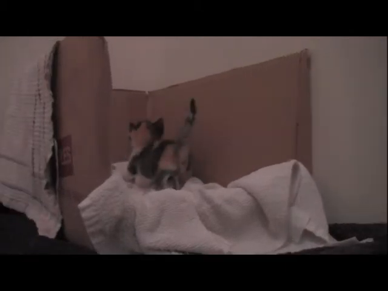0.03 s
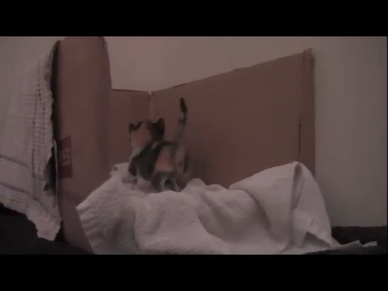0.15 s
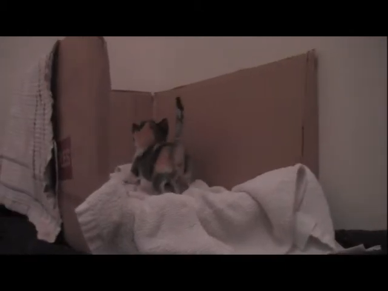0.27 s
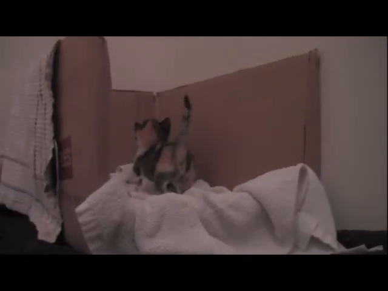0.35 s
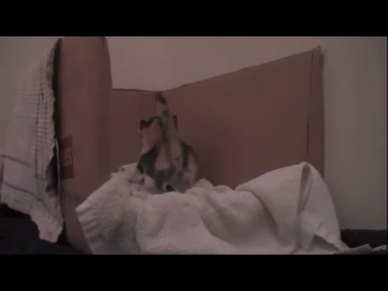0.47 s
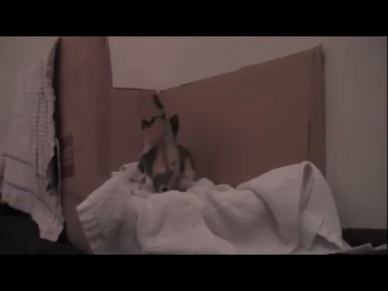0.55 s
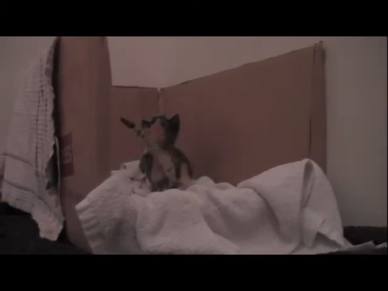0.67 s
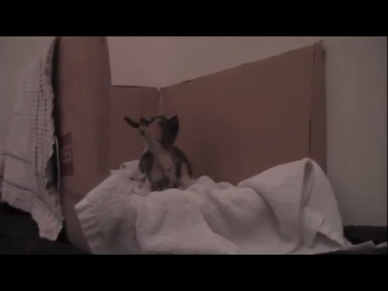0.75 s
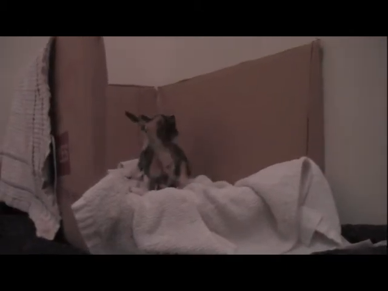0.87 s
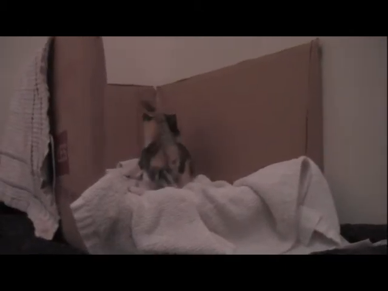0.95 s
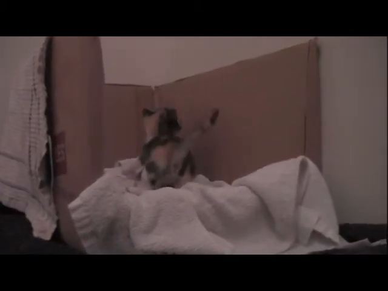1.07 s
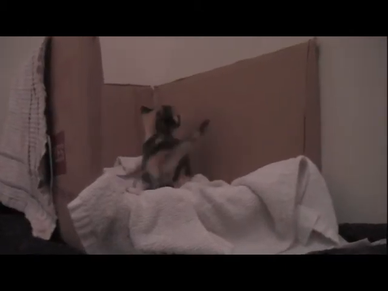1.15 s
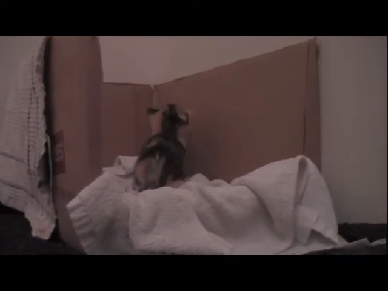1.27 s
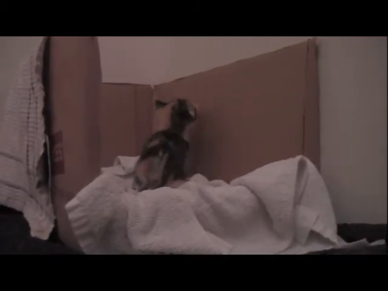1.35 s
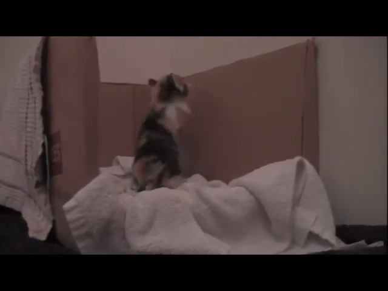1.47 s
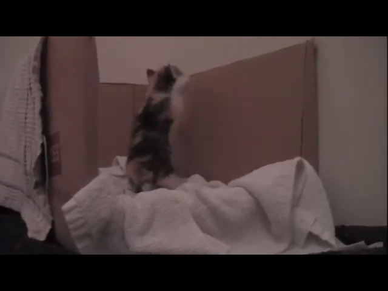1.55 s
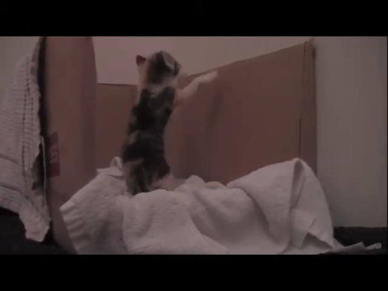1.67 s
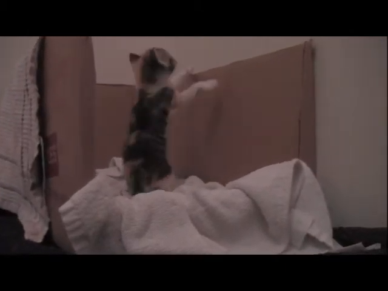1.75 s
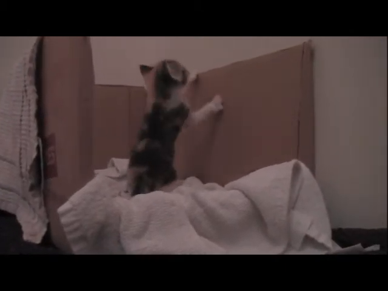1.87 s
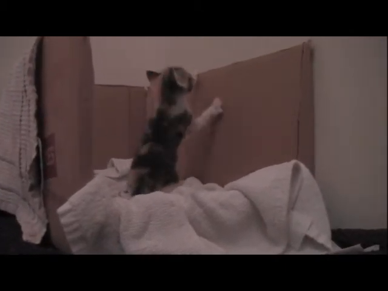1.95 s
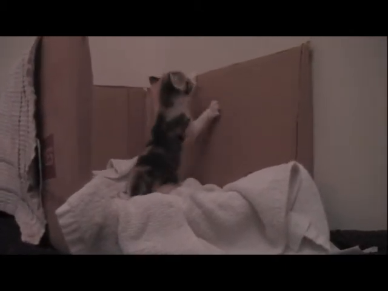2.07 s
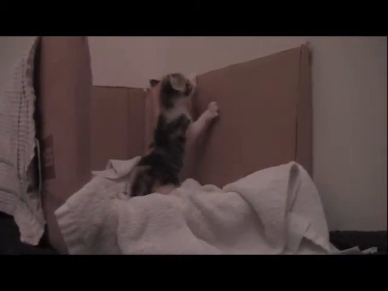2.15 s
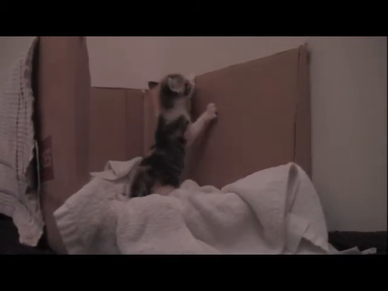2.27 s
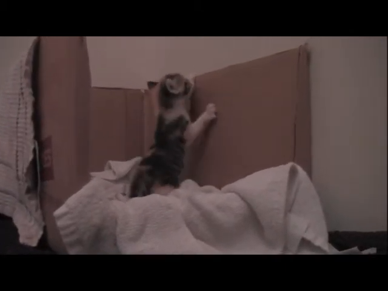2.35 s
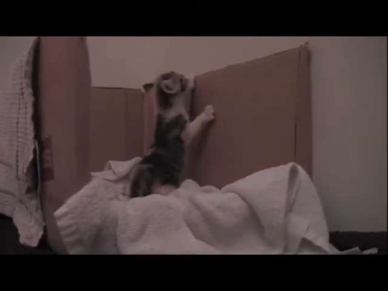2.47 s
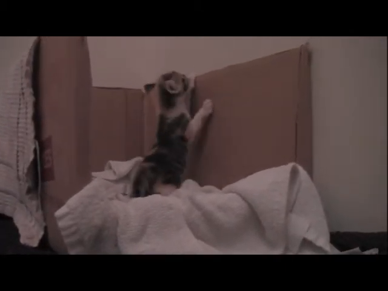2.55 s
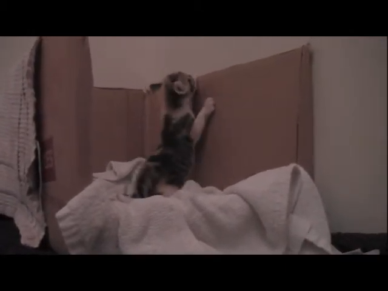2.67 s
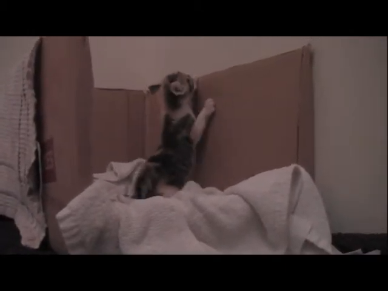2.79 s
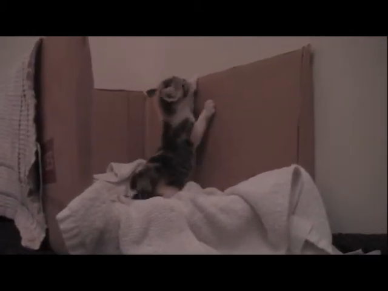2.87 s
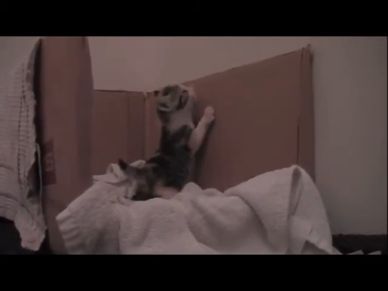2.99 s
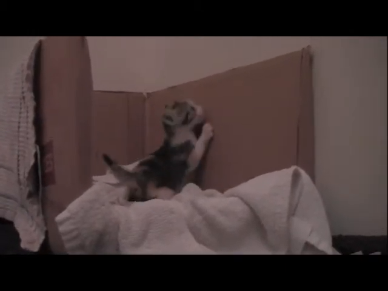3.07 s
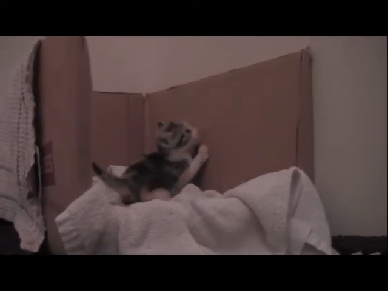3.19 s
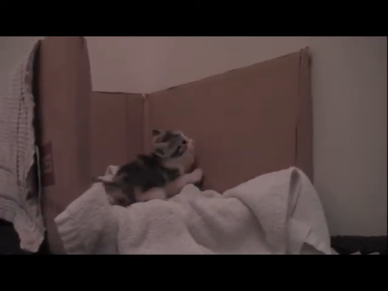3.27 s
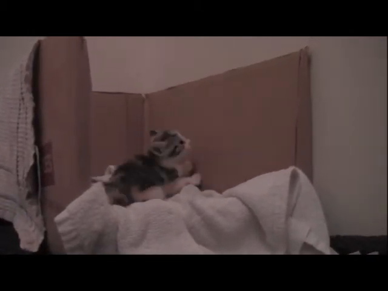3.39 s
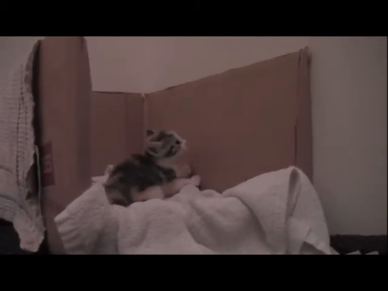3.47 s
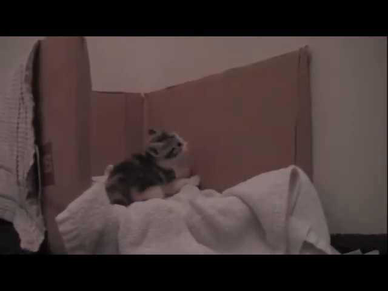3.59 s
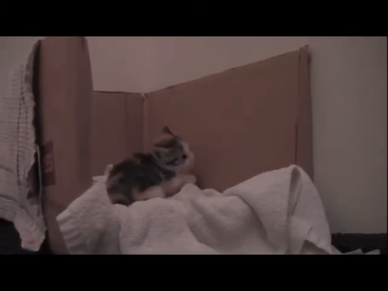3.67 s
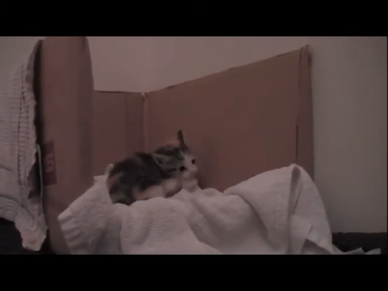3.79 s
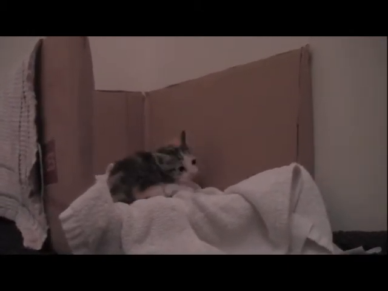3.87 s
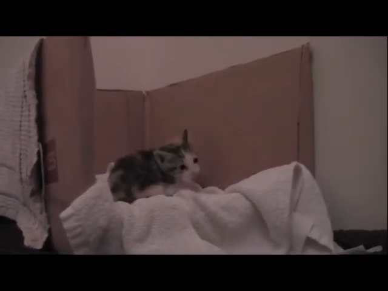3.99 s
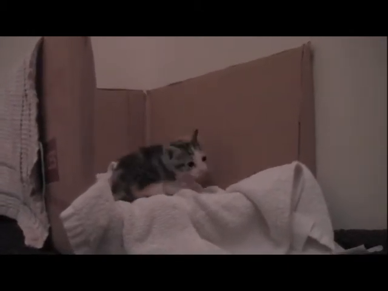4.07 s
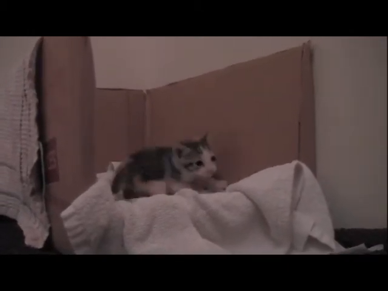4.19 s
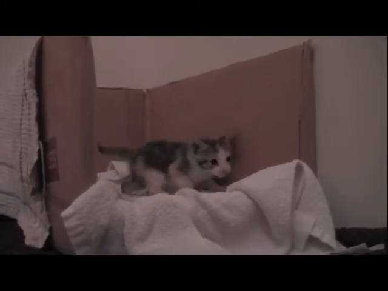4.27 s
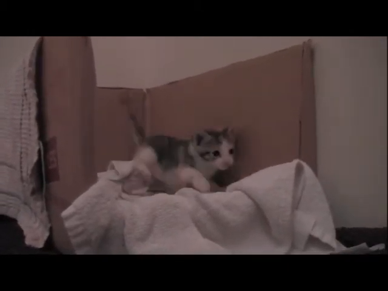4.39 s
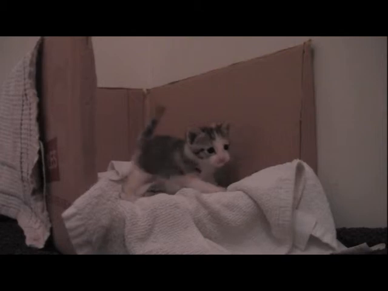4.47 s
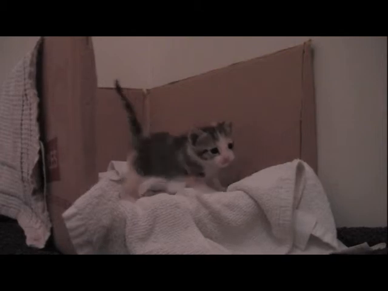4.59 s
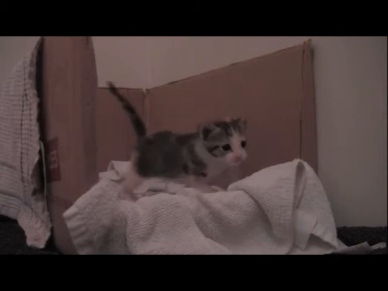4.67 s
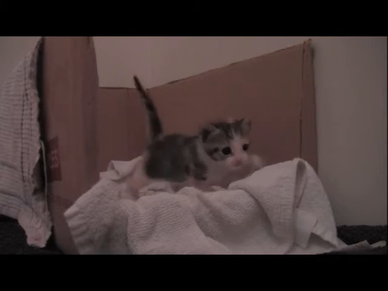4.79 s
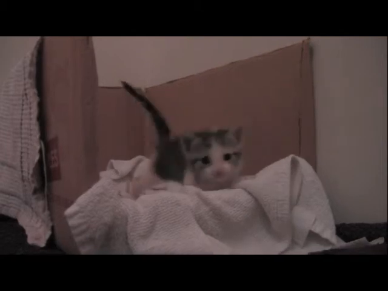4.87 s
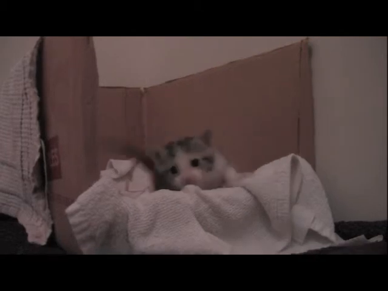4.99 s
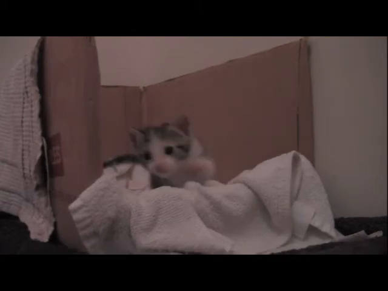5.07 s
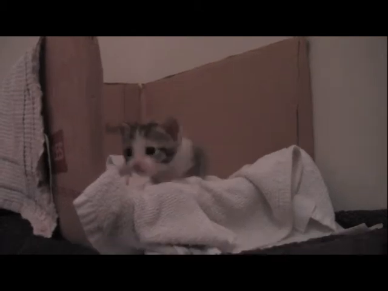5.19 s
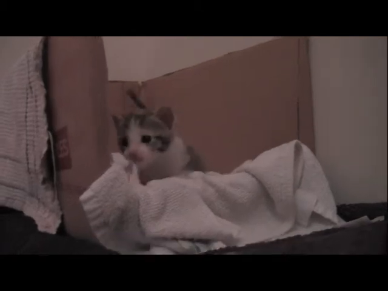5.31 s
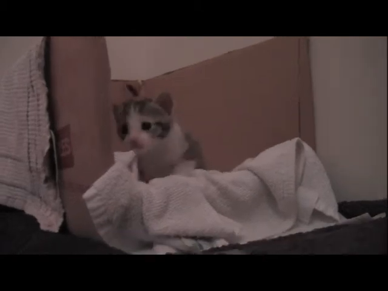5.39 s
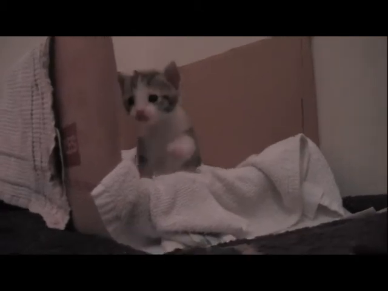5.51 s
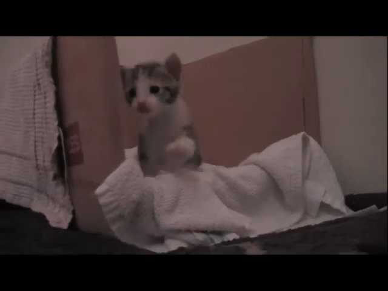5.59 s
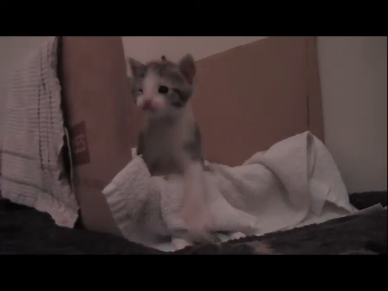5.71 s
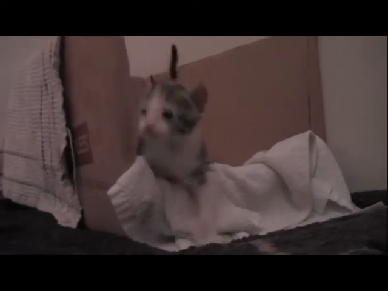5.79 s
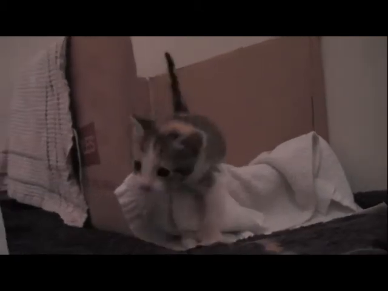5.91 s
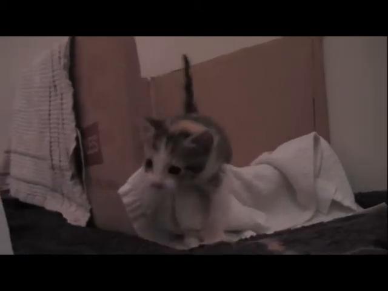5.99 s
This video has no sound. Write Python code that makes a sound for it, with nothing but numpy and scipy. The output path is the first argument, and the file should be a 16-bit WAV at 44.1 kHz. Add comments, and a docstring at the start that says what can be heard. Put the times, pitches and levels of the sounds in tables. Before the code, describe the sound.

Close scratching of small claws dragging down a cardboard box, sharp ticks and dull paw thumps, faint purring, soft cloth shuffles, steady microphone hiss.

```python
"""Kitten in a cardboard box

A kitten scrambles in a cardboard box on a towel, close to a small camera in a quiet room.
Its claws drag over the board (shaped noise) and catch on it (snaps with a dying rattle).
Paws and body bump the panels (decaying modes) and shove the towel (muffled, lumpy noise).
It purrs faintly (pulses through a chest resonance), over microphone hiss and a deep rumble.
"""
import sys
import numpy as np
from scipy import signal
from scipy.fft import rfft, irfft, next_fast_len
from scipy.io import wavfile
from scipy.ndimage import map_coordinates

SR = 44100
rng = np.random.default_rng(int(sys.argv[2]) if len(sys.argv) > 2 else 0)


def attenuation_scalar(level_db):
    """Turn a level in dB into a linear amplitude multiplier (20 dB per decade)."""
    decades = np.asarray(level_db, float) / 20
    return 10 ** decades


def materialize(psi):
    """Save the field psi as 16-bit PCM at rate SR to the path in sys.argv[1].

    A 1-D psi becomes a single channel; in a 2-D psi each row is a channel.
    """
    bounded = np.clip(np.atleast_2d(psi).T, -1, 1)
    quanta = np.round(bounded * 32767).astype(np.int16)
    wavfile.write(sys.argv[1], SR, quanta)


N = 266692
t = np.arange(N) / SR  # seconds

# Microphone hiss and room tone. Each row: frequency in Hz, relative density in dB per Hz.
HISS_SPECTRUM = [(20, -16), (75, -3), (160, -4.5), (320, -6), (630, -11), (910, -13), (1800, -17),
                 (4000, -21.5), (11700, -31), (13000, -51)]
# Left-right likeness of the hiss. Each row: frequency in Hz, correlation from 0 to 1.
HISS_LIKENESS = [(30, 0.56), (130, 0.78), (300, 0.0057), (3000, 0.015)]
# Deep rumble. Each row: time in seconds, level in dB.
RUMBLE_LEVEL = [(0, -67), (.9, -67), (1.4, -65), (2.0, -73), (4.2, -75), (4.68, -64), (5.0, -64.5),
                (5.7, -70.5), (6.05, -72)]
# Room decay. Each row: frequency in Hz, t60 in seconds.
ROOM_DECAY = [(200, 0.23), (2000, 0.22), (10000, 0.054)]
# Purr. Each row: time in seconds, rate in pulses per second, level in dB.
PURR_COURSE = [(0, 27.5, -62.5), (.33, 27, -59), (.5, 27, -79), (.75, 26.6, -66), (1.0, 26, -66.5),
               (1.4, 26.4, -63), (2.4, 29.4, -72), (3.6, 21.7, -74), (4.199, 27.5, -68), (4.7, 29, -71),
               (5.3, 26.3, -63.5), (6.05, 26, -80)]
# Resonance of the purring chest, applied twice. The row: centre in Hz, width of one pass in Hz.
CHEST_MODE = (165.5, 126)
# Paws pushing the towel. Each row: peak time in seconds, peak level in dB, seconds to rise 20 dB,
# seconds to fall 20 dB; times too short or negative are raised to a floor in swell().
TOWEL_SHOVES = [(1.46, -53.5, -0.1, 0.2), (1.95, -54.5, -0.08, 0.17), (3.55, -56, -0.02, 0.16),
                (4.07, -59.5, 0, 0.17), (4.41, -58, 0, 0.17), (4.51, -54, 0.12, -0.02),
                (4.97, -58, -0.18, 0.06), (5.09, -56.5, -0.12, 0.05), (5.26, -55.5, -0.05, 0),
                (5.9, -53, -0.17, .1)]
# Resonance of the cloth, applied twice. The row: centre in Hz, width of one pass in Hz.
TOWEL_MODE = (380, 320)
# Bumps on the panels. Each row: start in seconds, level in dB, tone struck hardest in Hz,
# t60 in seconds of a mode at 400 Hz.
PANEL_BUMPS = [(0.179, -38, 180, 0.03), (.19, -39, 510, 0.029), (.672, -44.5, 600, 0.068),
               (.795, -49.5, 290, 0.13), (1.004, -51, 425, 0.1), (1.244, -42, 905, 0.032),
               (1.429, -46, 200, 0.12), (1.452, -35, 195, 0.046), (1.823, -22, 527, 0.046),
               (1.922, -38, 393, 0.063), (1.935, -35, 289, 0.095), (3.064, -23.5, 570, 0.047),
               (3.081, -23, 604, 0.043), (3.086, -28, 290, 0.067), (3.2, -27.5, 1200, 0.056),
               (3.918, -47, 410, 0.086), (4.103, -41.5, 576, 0.037), (4.155, -46, 550, .03),
               (4.187, -46, 550, .03), (4.945, -42, 200, 0.057), (4.996, -42.5, 400, 0.044),
               (5.079, -46, 464, 0.053), (5.234, -45, 170, 0.046), (5.239, -37, 390, 0.065),
               (5.401, -38, 190, .05), (5.875, -35, 704, 0.04), (5.886, -41.5, 328, .06),
               (5.926, -41, 160, 0.038), (5.992, -38, 493, 0.027)]
# Cardboard panel modes. Each row: frequency in Hz, level in dB, width in Hz before drags broaden it.
PANEL_MODES = [(160, -2, 42), (290, -1, 64), (510, -0.5, 58), (718.5, -0.5, 54), (947, 0, 110),
               (1313, -7.5, 330)]
# Claw tips catching; the first row is a click where the sound starts. Each row: start in seconds,
# peak of the ring in dB, ring in Hz, treble peak in dB relative to the ring.
CLAW_CATCHES = [(0.001, -38, 1730, -32), (0.187, -50, 2110, -14), (1.4304, -45.5, 1230, -16),
                (1.4533, -24, 4220, -22), (1.4894, -23, 4510, -18), (1.824, -43, 1160, 3.5),
                (1.917, -31.5, 1320, -15), (2.1954, -28.5, 3560, -5), (2.409, -40, 3990, -26),
                (2.4223, -40, 3970, -29), (2.466, -34, 3670, -26), (2.4822, -36, 3460, -25),
                (2.565, -38, 4010, -20), (2.605, -34, 2850, -25), (2.758, -38, 4140, -25),
                (2.776, -31.5, 3990, -17), (2.788, -35, 4930, -26), (2.823, -34, 4240, -25),
                (2.8716, -37, 3620, -11), (2.8854, -33.5, 4070, -26), (2.9183, -37, 4200, -25),
                (2.9525, -32, 3946, -25), (2.9714, -44, 3940, -21), (3.014, -35, 4630, -21),
                (3.0634, -21.5, 5920, -35), (3.0809, -28, 3960, -5), (3.621, -34, 3980, 0.5),
                (3.703, -36, 4100, -8), (4.0533, -40, 4100, -14), (4.297, -46, 3089, 0),
                (5.8435, -43.5, 1815, -33), (5.874, -44, 1724, -11.5), (5.886, -40, 2010, -7),
                (5.9042, -38, 2010, -11.5), (5.9125, -36.5, 1950, -19), (5.9905, -37.5, 2390, -31)]
# Claw drags, some swelling, some starting at once. Each row: peak time in seconds, peak level in dB,
# seconds to rise 20 dB, seconds to fall 20 dB (both floored in swell()), drumming of the panel
# in dB over the drag.
CLAW_STROKES = [(1.492, -32.5, .03, 0.0672, -28), (1.517, -30, 0.0624, 0.0516, -13.5),
                (1.601, -34, 0.04, 0.0845, -12), (1.635, -38.5, .07, 0.04, -11),
                (1.981, -29.5, 0.0184, 0.0451, -19), (2.01, -31, 0.05, -0.0041, -20),
                (2.074, -41.5, 0.07, 0.04, -17.5), (2.144, -49, 0.1, 0.11, -11.5),
                (2.294, -58.5, 0.25, 0.04, -1.5), (2.414, -57.5, .066, 0.12, -1),
                (2.577, -52, 0.11, 0.15, -6.5), (2.638, -45, 0.0041, 0.03, -7),
                (2.769, -50.5, 0.16, 0.1, -14.5), (2.881, -62, -1, -2.2, -16),
                (2.956, -47.5, 0.05, 0.02, -10.5), (3.035, -37, 0.0238, 0.08, -14),
                (3.112, -35.5, 0.0237, .25, -11), (3.22, -35, 0.1225, 0.3957, -16.5),
                (3.31, -35, 0.2831, 0.1581, -40.5), (3.42, -42.5, 0.22, 0, -17.5),
                (3.542, -49.5, 0.12, 0.19, -4.5), (3.631, -45, -0.01, 0.0658, -6),
                (3.734, -45.5, -0.09, 0.15, -8.5), (3.813, -39.5, 0.04, 0.0755, -7.5),
                (4.113, -49.5, 0, 0.0748, -10), (4.405, -57, 0.05, 0.21, 0), (4.52, -61.5, -0.07, 0.01, 3),
                (4.746, -70, 0.14, 0.5, -13), (5.835, -63.5, -0.36, 0.15, 6), (5.908, -59, -0.19, 0.08, 3),
                (6.0, -76, .1, 0.5, -2)]
# Swipes that land at once. Each row: start in seconds, level in dB, hold in seconds, seconds to
# fall 20 dB (floored in swell()), drumming of the panel in dB over the drag.
CLAW_SWIPES = [(0.184, -52.5, 0.025, 0.01, 3), (1.433, -61, 0, -0.2, -7), (1.45, -45.5, 0, 0.05, -12.5),
               (1.823, -64, 0, 0, 8.5), (1.913, -41, 0.00058, 0.0662, -1.5), (2.192, -46, .005, .054, -7),
               (2.463, -51.5, 0.018, 0.1, -4.5), (2.598, -49, 0.012, 0.1, -8),
               (2.706, -49.5, 0.0086, -0.01, -2.5), (2.819, -50, 0, 0, -10),
               (3.701, -48, 0.025, 0.12, -6.5), (3.917, -46, 0.015, 0.0842, -6.5),
               (4.044, -56, 0.022, -0.03, -1), (4.291, -61, 0.0058, 0.24, -3.5)]
# Spectrum of claw on board. Each row: frequency in Hz, relative density in dB per Hz.
CLAW_SPECTRUM = [(600, -29.5), (1600, -11), (2200, -4), (3200, -2.5), (4200, 0), (5200, -6), (6850, -6),
                 (9100, -5.5), (10500, -12.5), (12000, -17.5), (13000, -48)]
# Colour of the scraping. Each row: time in seconds, treble in dB relative to the body of the drag,
# part under 3 kHz in dB relative to the bright part.
SCRAPE_COLOUR = [(.2, -24, 2.5), (1.44, -3.5, -5), (1.49, -9, -9.5), (1.53, -10.5, 0), (1.65, -10, -0.5),
                 (1.92, -15, -3.5), (2.07, -10.5, -8), (2.3, -11, -4), (2.63, -9, 1), (2.77, -15.5, -8.5),
                 (3.04, -12, -8.5), (3.17, -9.5, -1), (3.23, -6, -8.5), (3.45, -8, -2), (3.7, -6.5, -3.5),
                 (3.95, -15, -4.5), (4.3, -6, -1.5), (5.9, -7, 6)]

RISE_ROUND, FALL_ROUND = 1.25, 0.95  # 1 = straight in dB, more = rounder top
LAND_S = 0.003  # seconds for a swipe to rise 20 dB
RATTLE_S = 0.013  # t60 of the fibres after a catch, seconds
TOP_HZ = 12650  # upper band limit of the camera


def unit(x):
    """Normalisation: x at rms 1."""
    return x / np.sqrt(np.mean(x ** 2) + 1e-20)


def along(points, hz):
    """Interpolation of (Hz, value) points on a logarithmic frequency axis."""
    f, v = np.transpose(points)
    return np.interp(np.log(hz + 1), np.log(f + 1), v)


def wobble(rate):
    """Slow random modulation: a smooth curve through rate random knots a second."""
    return map_coordinates(rng.standard_normal(int(N * rate / SR) + 4), [t * rate])


def filtered(x, response):
    """Linear filtering: the spectrum of x times a complex response of frequency."""
    m = next_fast_len(x.shape[-1] + 8192)
    spectrum = rfft(x, m) * response(np.fft.rfftfreq(m, 1 / SR))
    return irfft(spectrum, m)[..., :x.shape[-1]]


def mode(f, hz, width):
    """Damped resonance: one causal mode, gain 1 at its centre."""
    return 1j * f * width / (hz * hz - f * f + 1j * f * width)


def above(f, hz):
    """High-pass magnitude: a smooth step from 0 to 1 at hz."""
    return 1 / (1 + (hz / (f + 1)) ** 8)


def causal(gain):
    """Minimum phase: the response of a magnitude by folding its cepstrum."""
    c = irfft(np.log(gain + 1e-6))
    c[1:len(c) // 2] *= 2
    c[len(c) // 2 + 1:] = 0
    return np.exp(rfft(c))


def claw(x, share):
    """Spectral shaping: x in the claw colour, keeping a share of each frequency."""
    return filtered(x, lambda f: causal(attenuation_scalar(along(CLAW_SPECTRUM, f)) * share(f)))


def swell(s, rise_s, hold_s, fall_s):
    """Power envelope of one movement: it rises to 1 at s, holds, then falls."""
    rising = np.maximum(s - t, 0) / max(rise_s, .001)
    falling = np.maximum(t - s - max(hold_s, 0), 0) / max(fall_s, .005)
    return attenuation_scalar(-40 * (rising ** RISE_ROUND + falling ** FALL_ROUND))


def hiss():
    """Partial correlation: steady noise, mostly each microphone's own, split into mid and side."""
    turn = lambda f: np.arccos(np.clip(along(HISS_LIKENESS, f), -1, 1)) / 2
    pair = rng.standard_normal((2, N))
    split = lambda f: attenuation_scalar(along(HISS_SPECTRUM, f)) * [np.cos(turn(f)), np.sin(turn(f))]
    mid, side = filtered(pair, split)
    return attenuation_scalar(-58.5) * unit(np.array([mid + side, mid - side]))


def rumble():
    """Low-pass noise: a deep rumble that swells and fades, partly each microphone's own."""
    deep = filtered(rng.standard_normal((3, N)), lambda f: mode(f, 23, 40) ** 2)
    own, shared = deep[:2], deep[2]
    return attenuation_scalar(np.interp(t, *np.transpose(RUMBLE_LEVEL))) * unit(own + 1.9 * shared)


def room(x):
    """Reverberation: each frequency of the room's answer dies at its own speed."""
    hz, u, z = signal.stft(rng.standard_normal((2, SR // 3)), SR, nperseg=256)
    decay = attenuation_scalar(-60 * u / along(ROOM_DECAY, hz)[:, None])
    mid, side = signal.istft(z * decay, SR, nperseg=256)[1]
    tail = mid + 0.6 * np.array([side, -side])  # the microphones sit close together
    tail = tail / np.linalg.norm(tail[0])
    delayed = np.pad(x, (130, 0))[None]  # samples
    return signal.fftconvolve(delayed, tail, axes=1)[:, :N]


def purr():
    """Source and filter: one soft laryngeal pulse per cycle, thudding in the chest resonance."""
    s, rate, db = np.transpose(PURR_COURSE)
    uneven_rate = np.interp(t, s, rate) * (1 + 0.009 * wobble(24))
    cycles = np.cumsum(uneven_rate) / SR + 0.093
    pulses = np.diff(np.floor(cycles), prepend=0) * attenuation_scalar(1.8 * wobble(28))
    thud = filtered(pulses, lambda f: mode(f, *CHEST_MODE) ** 2)
    return unit(thud) * attenuation_scalar(np.interp(t, s, db))


def towel():
    """Friction damped by thick cloth: muffled, lumpy noise under each shove's envelope."""
    power = sum(attenuation_scalar(2 * db) * swell(s, rise_s, 0, fall_s) for s, db, rise_s, fall_s in TOWEL_SHOVES)
    lumps = rng.standard_normal(N) * attenuation_scalar(4.8 * wobble(60))
    return np.sqrt(power) * unit(filtered(lumps, lambda f: mode(f, *TOWEL_MODE) ** 2))


def bumps():
    """Modal excitation: a soft paw rings the panel modes near its tone, with a dull puff of towel."""
    out, u = np.zeros(N + SR), t[:SR // 4]
    for s, db, tone_hz, t60 in PANEL_BUMPS:
        fade_db = -60 * u / max(t60, .01)
        ring = 0
        for hz, level_db, _ in PANEL_MODES:
            reach_db = -8 * abs(np.log2(hz / tone_hz))
            # each bump detunes each mode a little at random
            detuned_hz = hz * (1 + .02 * rng.normal())
            decay_db = fade_db * (hz / 400) ** 0.45  # higher modes die first
            mode_db = level_db + reach_db + rng.normal(0, 2.6) + decay_db
            ring = ring + attenuation_scalar(mode_db) * np.sin(2 * np.pi * detuned_hz * u)
        noise = rng.standard_normal(len(u))
        puff = unit(filtered(noise, lambda f: mode(f, 0.88 * tone_hz, 0.21 * tone_hz)))
        thump = ring / np.abs(ring).max() + 0.2 * puff * attenuation_scalar(0.52 * fade_db)
        soft_onset = 1 - np.exp(-u / 0.0011)
        out[round(s * SR):][:len(u)] += attenuation_scalar(db) * thump * soft_onset
    return out[:N]


def catches():
    """Impulsive excitation: a snap as a tip lets go (or the opening click), with a short dying rattle."""
    out, u = np.zeros(N + SR), t[:SR // 10]
    peak = lambda x: x / np.abs(x).max()
    for s, db, hz, treble_db in CLAW_CATCHES:
        rattle = .16 * rng.standard_normal(len(u)) * attenuation_scalar(-60 * u / RATTLE_S)
        rattle[0] += 1  # the snap
        body = filtered(rattle, lambda f: mode(f, hz, 1.2 * hz) ** 2 * (1 - above(f, 1.8 * hz)))
        treble = claw(rattle, lambda f: above(f, 6700))
        out[round(s * SR):][:len(u)] += attenuation_scalar(db) * (peak(body) + attenuation_scalar(treble_db) * peak(treble))
    return out[:N]


def strokes():
    """Stick-slip friction: uneven noise stands for dense fibre slips that also drum the panel."""
    drag, drumming = 1e-10, 1e-10  # powers
    rows = [(s, db, rise_s, 0, fall_s, drum_db) for s, db, rise_s, fall_s, drum_db in CLAW_STROKES]
    rows += [(s + LAND_S, db, LAND_S, *rest) for s, db, *rest in CLAW_SWIPES]
    for s, db, rise_s, hold_s, fall_s, drum_db in rows:
        power = attenuation_scalar(2 * db) * swell(s, rise_s, hold_s, fall_s)
        drag = drag + power
        drumming = drumming + attenuation_scalar(2 * drum_db) * power
    drag_db, drum_db = 10 * np.log10(drag), 10 * np.log10(drumming)
    s, *shares = np.transpose(SCRAPE_COLOUR)
    treble_db, dull_db = [np.interp(t, s, c) for c in shares]

    # a light claw skips, a heavy one hisses
    spread = np.clip(.25 - .012 * (drag_db + 38), .12, 1)
    # the corrugation, felt in every band
    ridges = attenuation_scalar(0.48 * wobble(60)) * np.exp(0.19 * spread * wobble(500))

    def slips():
        """Intermittent noise: slips of random strength, drawn afresh for each band."""
        skips = np.exp(spread * (0.79 * wobble(700) - 0.69 * spread))
        return rng.standard_normal(N) * ridges * skips

    dull = unit(claw(slips(), lambda f: 1 - above(f, 3050)))
    bright = unit(claw(slips(), lambda f: above(f, 2800) * (1 - above(f, 6700))))
    treble = unit(claw(slips(), lambda f: above(f, 7400)))
    body = (attenuation_scalar(dull_db) * dull + bright) / np.sqrt(1 + attenuation_scalar(2 * dull_db))

    def panel(f):
        """Modal sum: broadened panel modes with alternating sign."""
        return sum((-1) ** k * attenuation_scalar(db) * mode(f, hz, 2.8 * width)
                   for k, (hz, db, width) in enumerate(PANEL_MODES))

    drum = filtered(rng.standard_normal(N) * attenuation_scalar(2.8 * wobble(80)), panel)
    return attenuation_scalar(drag_db) * (body + attenuation_scalar(treble_db) * treble) + attenuation_scalar(drum_db) * unit(drum)


def scene():
    """Superposition: the kitten straight ahead, in the room, over hiss and rumble."""
    kitten = strokes() + catches() + bumps() + towel() + purr()
    return kitten + attenuation_scalar(-12) * room(kitten) + hiss() + rumble()


def side_masked(x):
    """Spectral masking: left-right difference is dropped outside a band that shrinks when loud."""
    mid_side = np.array([x[0] + x[1], x[0] - x[1]]) / 2
    hz, _, (mid, side) = signal.stft(mid_side, SR, nperseg=1024)
    power_db = 10 * np.log10(np.sum(np.abs(mid) ** 2, axis=0) + 1e-12)
    loud = np.clip((power_db + 58) / 19, 0, 1)
    top_hz, low_hz = 3900 * 0.21 ** loud, 250 * loud ** 3
    side = side * ((hz[:, None] < top_hz) & (hz[:, None] >= low_hz))
    mid = mid * attenuation_scalar(-9 * loud * (hz[:, None] < 90))  # the deepest bass dips when it is loud
    mid, side = signal.istft(np.array([mid, side]), SR, nperseg=1024)[1][:, :N]
    return np.array([mid + side, mid - side])


def low_pass(x):
    """Removes everything above the highest recorded frequency."""
    return signal.sosfilt(signal.butter(12, 13350, fs=SR, output="sos"), x)


def record(dry):
    """Band limitation: the camera cuts the top; left-right difference is then masked."""
    limited = filtered(dry, lambda f: f < TOP_HZ)
    mix = side_masked(limited)
    return low_pass(mix)


dry = scene()
out = record(dry)
materialize(out)
```